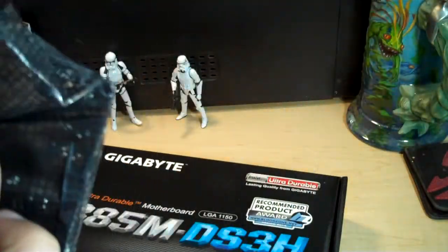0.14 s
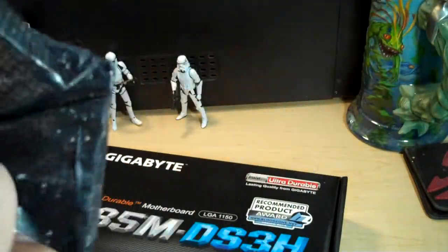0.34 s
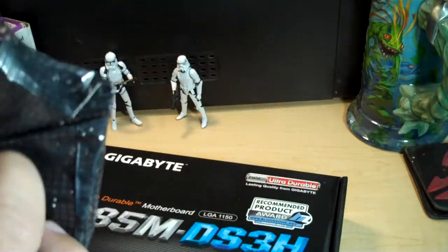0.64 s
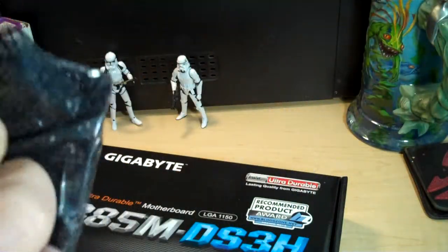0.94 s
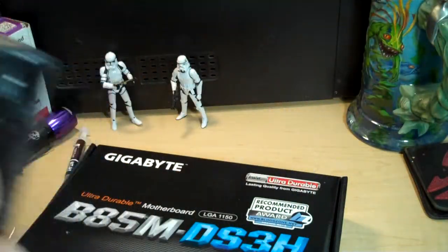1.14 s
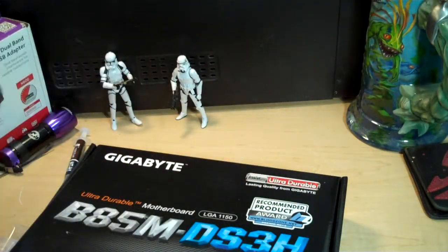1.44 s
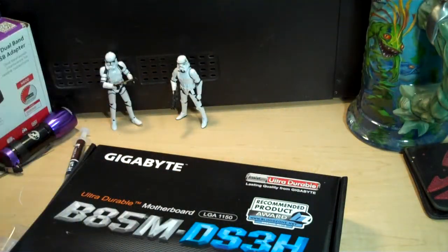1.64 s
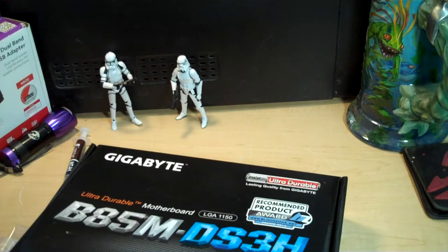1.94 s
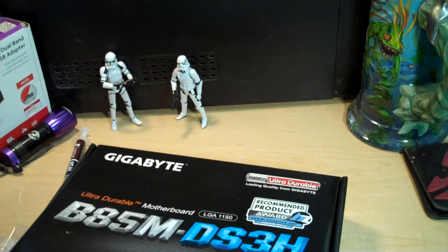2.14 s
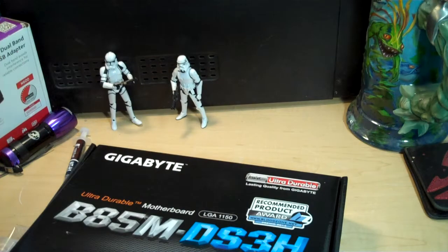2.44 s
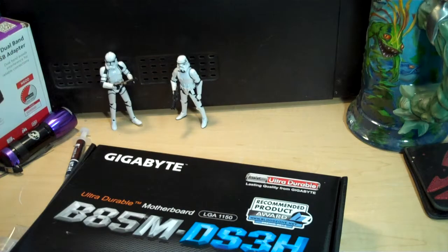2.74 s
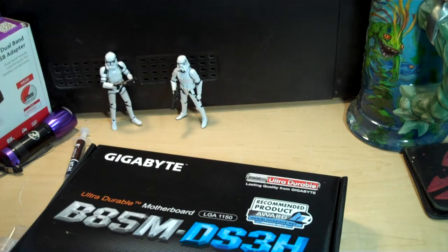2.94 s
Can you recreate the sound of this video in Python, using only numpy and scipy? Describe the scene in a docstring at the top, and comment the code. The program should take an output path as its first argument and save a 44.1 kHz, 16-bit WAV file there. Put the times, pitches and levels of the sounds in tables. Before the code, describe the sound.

In a small, quiet room, a stiff plastic bag crackles and snaps unevenly just left of the microphone. Near the end, a brief squeak and a loud snap lead into fuller rustling as the bag is pulled open.

```python
"""Anti-static bag, close up

A stiff plastic bag is handled and pulled open just left of a small stereo camera on a desk, in a
small, quiet room. Creases buckle in sharp snaps that ring the film and set off smaller ones; between
them the film rustles, most of all as it squeaks and slides open near the end. The microphone ports
ring in the treble and the loudest snaps clip, with short low thumps under them."""
import sys
import numpy as np
from scipy import signal
from scipy.fft import rfft, irfft
from scipy.io import wavfile
from scipy.ndimage import uniform_filter1d, map_coordinates

SR = 44100
rng = np.random.default_rng(int(sys.argv[2]) if len(sys.argv) > 2 else 0)


def file_out(sig):
    """Save sig as 16-bit WAV at sys.argv[1]."""
    # one column per channel
    cols = np.atleast_2d(sig).T
    # limit, then scale
    lim = np.clip(cols, -1, 1)
    pcm = np.round(lim * 32767).astype(np.int16)
    wavfile.write(sys.argv[1], SR, pcm)


N = 136710

RIGHT_DB = -13  # rustle and squeak arrive weaker on the far side
CRACK_LIKENESS = 0.72  # correlation of a crack between the two microphones
BUSY_DB = -35  # reference level of film being worked


def undb(db):
    """Decibels to gain."""
    return 10 ** (np.asarray(db) / 20)


def unit(x):
    """Scale to rms 1."""
    return x / np.sqrt(np.mean(x ** 2))


def add(track, s, sound):
    """Mix a sound in at s seconds."""
    part = track[..., max(int(s * SR), 0):][..., :sound.shape[-1]]
    part += sound[..., :part.shape[-1]]


def response(colour, size=1024):
    """Minimum-phase impulse response of a colour (f/Hz, level/dB)."""
    hz, db = np.array(colour).T
    f = np.maximum(np.fft.rfftfreq(size, 1 / SR), 1)
    gain = undb(np.interp(np.log(f), np.log(hz), db))
    cepstrum = irfft(np.log(gain))
    cepstrum[1:size // 2] *= 2
    cepstrum[size // 2 + 1:] = 0
    return irfft(np.exp(rfft(cepstrum)))


def through(x, impulse):
    """Pass a sound through an impulse response."""
    return signal.fftconvolve(x, impulse)[:len(x)]


def highpass(x, hz, order=2):
    """Roll off the sound below hz."""
    return signal.sosfilt(signal.butter(order, hz, "high", fs=SR, output="sos"), x)


def waver(seconds, size=N):
    """Random unevenness of rms 1 that changes in about this time."""
    return unit(uniform_filter1d(rng.standard_normal(size), int(seconds * SR)))


def alike(left, own, likeness):
    """The right microphone gets partly the left one's waveform, partly its own."""
    return likeness * left + np.sqrt(1 - likeness ** 2) * own


def tiny_buckles(level_db, busy_per_s=1500, spread_db=2.8):
    """Ticks of random pitch and size that come thicker the harder the film is worked."""
    pitches_hz = np.geomspace(500, 9000, 10)
    chance = busy_per_s / SR * undb((level_db - BUSY_DB) / 2) / len(pitches_hz)
    out = np.zeros(N)
    for hz in pitches_hz:
        size = undb(spread_db * np.minimum(rng.exponential(size=N), 4))
        direction = np.sign(rng.standard_normal(N))
        kicks = size * direction * (rng.random(N) < chance)
        out += signal.lfilter(*signal.iirpeak(hz, Q=2.4, fs=SR), kicks)
    return unit(out)


def brighten(x, level_db, db_per_db=0.09):
    """Film that is worked harder sounds crisper."""
    top = signal.sosfiltfilt(signal.butter(2, 9500, "high", fs=SR, output="sos"), x)
    return x - top + top * undb(db_per_db * np.maximum(level_db - BUSY_DB, 0))


# colours of the film's treble fizz and midrange rub: f/Hz, level/dB
FIZZ_COLOUR = [(100, -16), (1500, -46), (3000, 0), (4500, -3), (6000, 1), (8000, 0.5), (10000, -2.5),
               (13000, -3.5), (16000, 8)]
RUB_COLOUR = [(40, -7), (120, -10.5), (220, -4), (400, -5.5), (900, -1), (1800, 2.5), (3000, 0.5),
              (4500, -5), (7000, -10), (15000, -7)]
# course of the handling: t/s, relative fizz level/dB, relative rub level/dB
HANDLING = [(0, -44, -49), (0.08, -39, -48), (0.15, -30.5, -41), (0.19, -34.5, -44.5), (0.235, -40, -43),
            (0.279, -27, -36.5), (0.315, -36, -49), (0.36, -35, -43.5), (0.42, -25.5, -46),
            (0.48, -42, -49), (0.51, -39, -45.5), (0.57, -51, -44), (0.64, -44.5, -47), (0.7, -42, -47),
            (0.77, -39, -47), (0.91, -39, -54), (0.982, -40.5, -50.5), (1.03, -34, -54), (1.07, -28, -44),
            (1.14, -39.5, -52), (1.25, -41.5, -50.5), (1.33, -32.5, -50), (1.42, -47.5, -45.5),
            (1.49, -37, -50), (1.62, -38, -47), (1.722, -37, -49.5), (1.77, -45.5, -59.5),
            (1.86, -33.5, -51), (1.93, -36, -54), (2.001, -28.5, -42.5), (2.08, -37.5, -60),
            (2.16, -42, -46), (2.23, -31.5, -43), (2.31, -43, -55.5), (2.359, -37.5, -46),
            (2.425, -43, -58), (2.465, -36, -46.5), (2.56, -38, -48), (2.62, -38, -37),
            (2.67, -29.5, -44.5), (2.709, -21.5, -32), (2.78, -22, -31.5), (2.832, -28.5, -35),
            (2.887, -34.5, -41), (2.928, -29, -35.5), (3.002, -21.5, -36), (3.062, -37.5, -42.5),
            (3.1, -25, -40.5)]


def rustle():
    """Countless tiny buckles over the smooth hiss of film sliding on film, close on the left."""
    t = np.arange(N) / SR
    s, fizz_db, rub_db = np.array(HANDLING).T
    out = np.zeros((2, N))
    layers = (FIZZ_COLOUR, fizz_db, -4.5, CRACK_LIKENESS), (RUB_COLOUR, rub_db, 3, 0.93)
    for colour, course_db, gain_db, likeness in layers:
        level_db = np.interp(t, s, course_db) + 1.92 * waver(0.008)  # the film catches and lets go
        textures = [tiny_buckles(level_db) + rng.standard_normal(N) for _ in range(2)]
        left, own = (unit(through(x, response(colour))) for x in textures)
        right = alike(left, own, likeness) * undb(RIGHT_DB)
        out += undb(level_db + gain_db) * brighten(np.array([left, right]), level_db)
    return out


# colour of the room's air: f/Hz, level/dB
AIR_COLOUR = [(25, -4), (60, 2), (150, 1.5), (400, 2.5), (1000, -5), (4000, -25), (15000, -6.5)]


def room_tone():
    """Faint steady air of the room, partly common to both microphones."""
    left, own = (unit(through(rng.standard_normal(N), response(AIR_COLOUR))) for _ in range(2))
    return undb(-56) * np.array([left, 0.28 * left + 0.45 * own])


def burst(decay_s, impulse, size=2048):
    """Dying film vibration with its own random resonances and tilt; the energy of 2.5 ms at rms 1."""
    t = np.arange(size) / SR
    spectrum = rfft(rng.standard_normal(size) * np.exp(-t / decay_s))
    f = np.maximum(np.fft.rfftfreq(size, 1 / SR), 1)
    octaves = np.clip(np.log2(f / 5000), -1, 1)
    tilt = undb(3.5 * rng.standard_normal() * octaves)
    evened = irfft(spectrum * tilt / np.abs(spectrum) ** 0.32)  # fills the band more evenly
    x = through(evened * np.exp(-t / (10 * decay_s)), impulse)
    return x * np.sqrt(0.0025 * SR / np.sum(x ** 2))


def crack_pair(decay_s, impulse):
    """A crack radiates a somewhat different waveform towards each microphone."""
    left = burst(decay_s, impulse)
    return np.array([left, alike(left, burst(decay_s, impulse), CRACK_LIKENESS)])


def panel_ring(impulse, hz, decay_s=0.00278):
    """A panel of film rings at its own pitch; the smaller and higher it is, the less bass it radiates."""
    resonance = signal.lfilter(*signal.iirpeak(hz, Q=8.2, fs=SR), impulse)
    return burst(decay_s, highpass(impulse + undb(7.5) * resonance, 0.28 * hz))


def after_crackle(impulse, decay_s=0.0034, grain_s=0.00061):
    """Smaller cracks set off by a snap: a burst broken into grains of the same total energy."""
    smooth = crack_pair(decay_s, impulse)
    grainy = smooth * undb(7 * waver(grain_s, size=smooth.shape[-1]))
    return grainy * np.linalg.norm(smooth) / np.linalg.norm(grainy)


# colours of a cracking crease and of the panel beside it: f/Hz, level/dB
CRACK_COLOUR = [(100, -37), (700, -11), (2000, -15.5), (4000, -2.5), (6000, -1), (8000, 2), (10000, -2.5),
                (13000, -3.5), (16000, 0)]
PANEL_COLOUR = [(100, -3), (250, -5.5), (500, -5), (1100, -2.5), (2200, 2.5), (3200, -0.5), (4500, -4),
                (7000, -8), (15000, -47.5)]
# buckling creases, levels before each part's own gain:
# t/s, crack level/dB, panel level/dB, panel f/Hz, after-crackle re crack/dB, left minus right/dB
CREASES = [(0.0476, -26.5, -41, 3400, -22, 10), (0.0677, -23, -32, 3120, -16, 12),
           (0.093, -11, -19, 3070, -8, 16), (0.1096, -5, -24.5, 4380, -28, 12),
           (0.1363, -14, -25, 2930, -29, 12), (0.1401, -17, -21, 2550, -20, 19),
           (0.2105, -4, -17.5, 2570, -14, 13.5), (0.225, -23, -26, 2830, -19, 20),
           (0.247, -22, -19, 3400, 3, 13), (0.266, -33, -28, 2610, 2, 11),
           (0.2759, -10.5, -23.5, 2130, -6, 19), (0.285, -12.5, -20.5, 1680, 6, 11.5),
           (0.3332, -8.5, -21, 5000, 4.5, 12), (0.3415, -7.5, -20, 5000, -29, 22),
           (0.363, -19, -51, 4760, -2, 20), (0.3791, -5.5, -50, 4630, -19, 23),
           (0.4093, -17, -47, 4890, -16, 16), (0.4273, -14.5, -36, 4570, -14, 12),
           (0.445, -30, -16, 5100, -20, 12), (0.4498, 4, -25, 4900, -25, 15),
           (0.4646, -9, -18.5, 2520, -20, 16), (0.489, -13, -41, 2910, -20, 18),
           (0.517, -13.5, -21, 2220, -18, 14), (0.5297, -26, -11.5, 1050, -14, 15),
           (0.536, -23.5, -25, 1100, 3.5, 6), (0.5519, -7.5, -15.5, 2500, -23, 32),
           (0.5549, -2, -19.5, 1700, -20, 9.5), (0.572, -31, -27, 2280, 17.5, 8),
           (0.6138, -26, -27, 3320, -21, 10), (0.6283, -24, -33, 4160, -13, 6),
           (0.669, -26.5, -36, 2960, -5, 12), (0.726, -22, -21, 4480, -14, 11.5),
           (0.732, -16, -46, 3680, 4, 14), (0.752, -22, -30.5, 2010, 3.5, 12.5),
           (0.9952, -29, -26.5, 1710, -10, 12), (1.0093, -20.5, -34.5, 2140, -3, 11),
           (1.035, -26.5, -37, 4000, -5, 9), (1.0647, -12, -49, 3300, -22, 28),
           (1.0686, -5.5, -25.5, 3420, -22, 10.5), (1.0886, -4, -23, 3680, -24, 15),
           (1.112, -1, -25.5, 1440, -24, 22), (1.168, -23.5, -29.5, 1680, 3, 11),
           (1.2085, -13.5, -28.5, 3600, -30, 10.5), (1.277, -17.5, -27.5, 3960, -12, 12),
           (1.3046, -11, -20.5, 2590, -3.5, 16.5), (1.3567, -14, -28.5, 2730, -14, 14),
           (1.3831, 1, -17, 4270, -3, 15), (1.4007, -5.5, -26, 1600, -13, 27),
           (1.4176, -6, -19, 796, -2.5, 14), (1.4496, -11, -56, 3360, -10, 12),
           (1.525, -13, -18, 3800, -13, 13), (1.5472, -19, -38, 4890, -1.5, 11),
           (1.598, -17, -24, 1520, 1, 12.5), (1.639, -23.5, -31.5, 3300, -22, 12),
           (1.6874, -18, -38, 4780, -15, 18), (1.704, -5, -25, 3770, -9.5, 11.5),
           (1.7316, -23.5, -31, 3560, -11, 12), (1.791, -12.5, -24.5, 2190, -11, 12),
           (1.808, -17, -24, 3200, -22, 15), (1.8757, -24, -32.5, 3000, -8, 10),
           (1.884, -8, -47, 4520, -8.5, 32), (1.897, -13.5, -28, 3750, -15, 8.5),
           (1.918, 0.5, -22.5, 4800, -8, 18), (1.9757, -19, -30, 3320, -10, 21),
           (1.9861, 2.5, -12, 2960, -1.5, 9.5), (2.0281, -5, -15, 4760, 1, 14),
           (2.0432, -11, -47, 4010, -23, 16), (2.087, -10.5, -34.5, 3340, -35, 15),
           (2.1204, -29, -38, 4490, -22, 10), (2.188, 0, -7.5, 3100, -3, 16.5),
           (2.1988, -10, -29, 4900, -6, 12), (2.211, -12, -47, 2690, -20, 19),
           (2.243, -10, -27, 4340, -4, 11), (2.291, -22, -33.5, 4890, -9, 12),
           (2.3367, -12, -24.5, 4800, -12, 14), (2.439, -11, -25, 3500, -2, 11),
           (2.5172, -11.5, -25, 1630, -34, 15), (2.5819, -26.5, -22.5, 4080, 5, 13),
           (2.587, -25, -29, 4170, 10, 19), (2.6584, -11, -11, 2070, 0, 16),
           (2.679, -17, -19, 2700, -18, 27), (2.6822, 9, 1.5, 2610, -11.5, 21.5),
           (2.7682, 0.5, -14, 2150, 2, 17), (2.8224, -10, -30, 3660, -8, 20),
           (2.8393, -12, -26, 2430, -10, 10), (2.899, -12.5, -31, 1870, -36, 28),
           (2.979, -25, -21, 2530, -11, 19), (3.0833, -17, -27.5, 4650, 0.5, 16)]


def snaps():
    """Each crease strains, cracks, rings its panel and trails off in a fine after-crackle."""
    out = np.zeros((2, N))
    crease, panel = response(CRACK_COLOUR), response(PANEL_COLOUR)
    for s, crack_db, panel_db, panel_hz, after_db, pan_db in CREASES:
        sides = undb([[0], [-pan_db]])
        # tiny cracks build up as the crease is about to give
        strain = undb(crack_db - 19.5) * burst(decay_s=0.0018, impulse=crease, size=1024)[::-1]
        crack = undb(crack_db - 9.5) * crack_pair(decay_s=0.00019, impulse=crease)
        ring = undb(panel_db - 2) * panel_ring(panel, panel_hz)
        crackle = undb(crack_db + after_db - 10) * after_crackle(crease)
        add(out, s - len(strain) / SR, sides * strain)
        add(out, s, sides * (crack + ring + crackle))
    return highpass(out, hz=330)  # thin film radiates little bass


# short low thumps under the loudest snaps: t/s, level before the low cut/dB, low cut f/Hz
LOW_THUMPS = [(0.4484, -27.5, 23), (0.5336, -22, 160), (1.1107, -34, 30), (1.3833, -29.5, 240),
              (1.988, -21, 11), (2.027, -45, 37), (2.681, -19, 200)]


def low_thumps(rise_s=0.00026):
    """Short low thumps under the loudest snaps: one pulse each, with its own low cut."""
    out, t = np.zeros(N), np.arange(SR // 10) / SR
    pulse = t / rise_s * np.exp(1 - t / rise_s)
    for s, db, low_hz in LOW_THUMPS:
        add(out, s, undb(db) * highpass(pulse, low_hz))
    return np.array([out, out * undb(RIGHT_DB / 2)])


# film sticking and slipping on film just before the bag gives: t/s, f/Hz, level/dB
STICK_SLIP = [(2.605, 1480, -60), (2.627, 1584, -40), (2.639, 1560, -34), (2.656, 1646, -28),
              (2.68, 1630, -23)]


def squeak(jitter=0.0234, roughness=0.67, waver_s=0.00278):
    """A short, scraping stick-slip tone and its octave, each unsteady in pitch and strength."""
    t = np.arange(N) / SR
    s, hz, db = np.array(STICK_SLIP).T
    pitch_hz = np.interp(t, s, hz) * (1 + jitter * waver(waver_s))
    phase = 2 * np.pi * np.cumsum(pitch_hz) / SR
    tone = np.zeros(N)
    for harmonic, gain in (1, 0.64), (2, undb(-3)):
        tone += gain * np.sin(harmonic * phase) * (1 + roughness * waver(waver_s))
    tone *= np.interp(t, s, undb(db), left=0, right=0)
    return np.array([tone, tone * undb(RIGHT_DB)])


def reflections(x, desk_decay_s=0.005, low_t60_s=0.19, treble_t60_s=0.12):
    """Quick reflections off the desk and nearby boxes, then the short tail of a small room."""
    t = np.arange(SR // 2) / SR
    split = signal.butter(2, 4000, fs=SR, output="sos")
    out = []
    for side_db in (0, -9):
        echoes = rng.standard_normal(len(t)) * (rng.random(len(t)) < 0.1)
        desk = echoes * np.exp(-t / desk_decay_s) * (t > 0.001)
        noise = rng.standard_normal(len(t)) * (t > 0.005)
        low = signal.sosfiltfilt(split, noise)
        tail = low * undb(-60 * t / low_t60_s) + (noise - low) * undb(-60 * t / treble_t60_s)
        impulse = undb(-10) * desk / np.linalg.norm(desk) + undb(-11) * tail / np.linalg.norm(tail)
        out.append(undb(side_db) * through(x, impulse))
    return np.array(out)


def scene(right_lag_s=0.00003):
    """At the desk: the bag close on the left, its reflections and the quiet room."""
    left, right = snaps() + low_thumps() + rustle() + squeak()
    right = map_coordinates(right, [np.arange(N) - right_lag_s * SR])
    return np.array([left, right]) + reflections(0.5 * left + right) + room_tone()


def port(x, hz, width_hz):
    """The air in a microphone port resonates and cuts the treble above it."""
    pole = np.exp((2j * np.pi * hz - np.pi * width_hz) / SR)
    feedback = np.poly([pole, pole.conjugate()]).real
    return signal.lfilter([feedback.sum()], feedback, x)


# the camera's microphone ports, left then right: resonance f/Hz, width/Hz
MIC_PORTS = [(7453, 1450), (6330, 990)]
# colour of the right microphone, shaded from the bag: f/Hz, level/dB
RIGHT_SHADE = [(100, -1.5), (1000, 3.5), (3000, 2), (6000, 2), (9000, -1.5), (14000, -7.5)]


def record(dry):
    """Two ringing ports, the right one shaded; the input clips, then deep bass and the top are cut."""
    left = port(dry[0], *MIC_PORTS[0])
    right = port(through(dry[1], response(RIGHT_SHADE)), *MIC_PORTS[1])
    clipped = np.clip([left, right], -0.88, 0.88)
    top_cut = signal.ellip(8, 0.2, 70, 14100, fs=SR, output="sos")
    return signal.sosfilt(top_cut, highpass(clipped, hz=70, order=1))


dry = scene()
out = record(dry)
file_out(out)
```